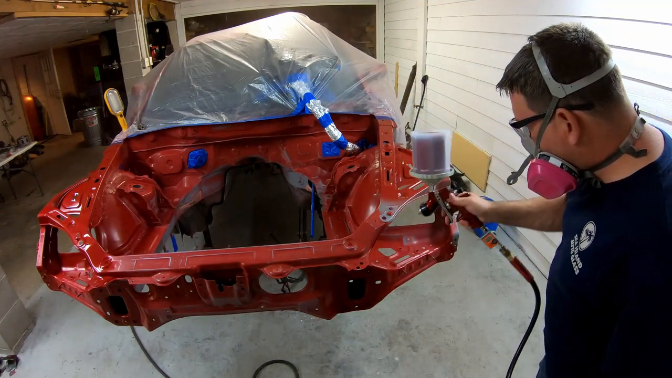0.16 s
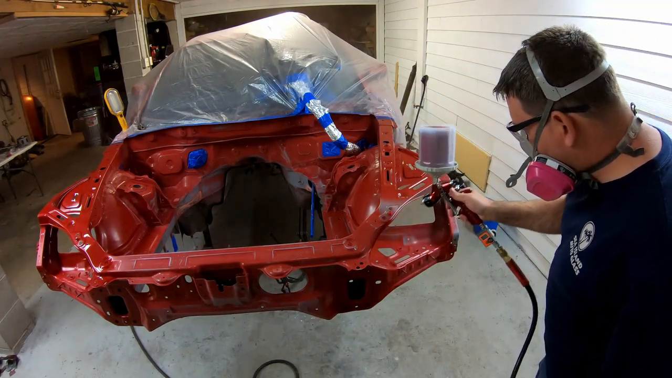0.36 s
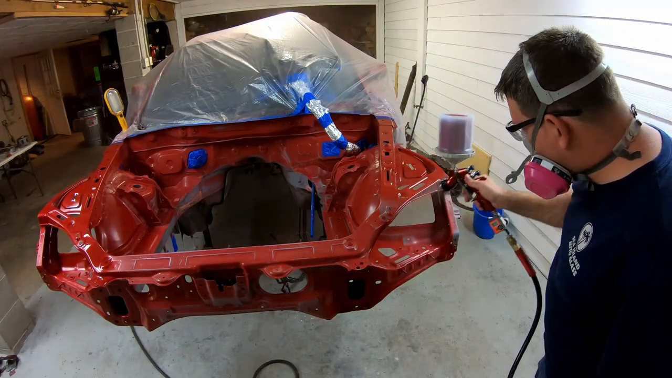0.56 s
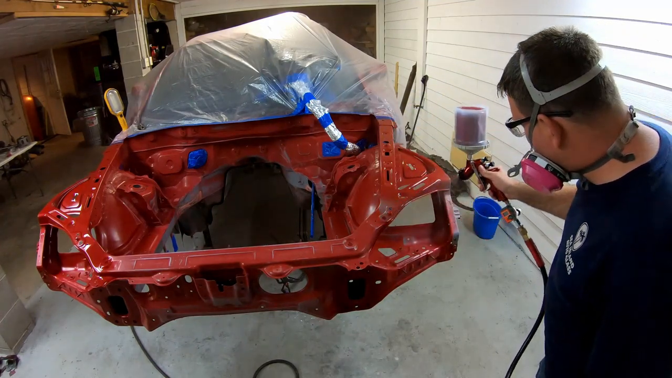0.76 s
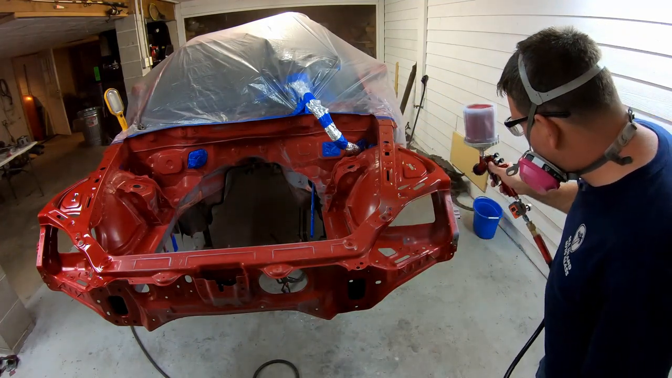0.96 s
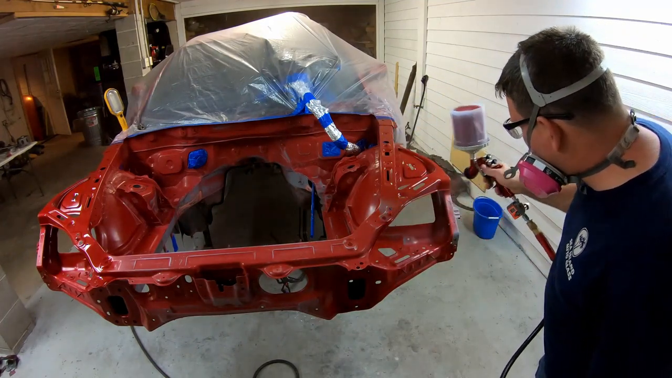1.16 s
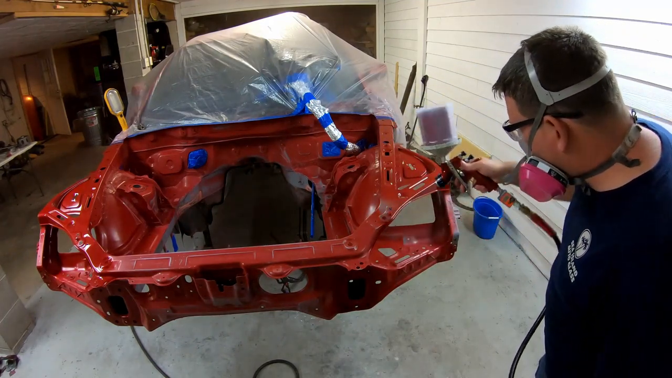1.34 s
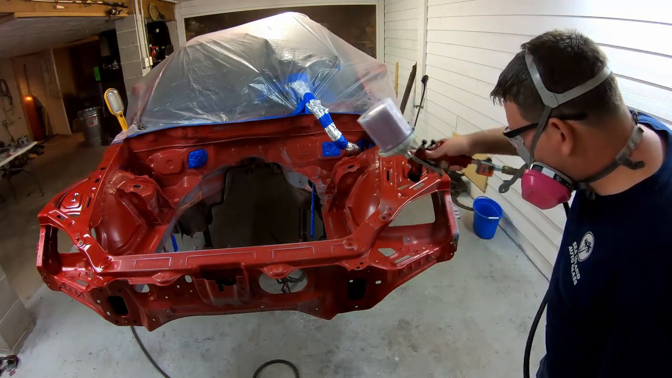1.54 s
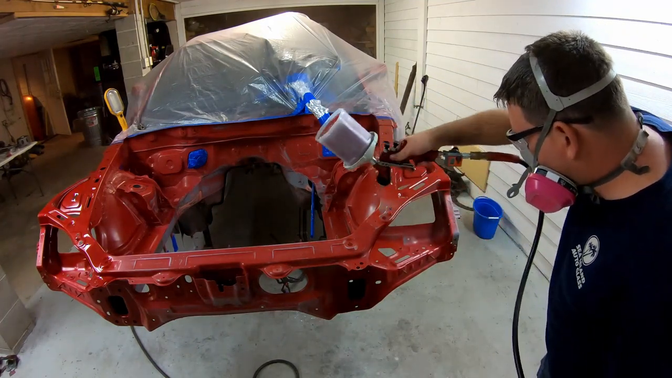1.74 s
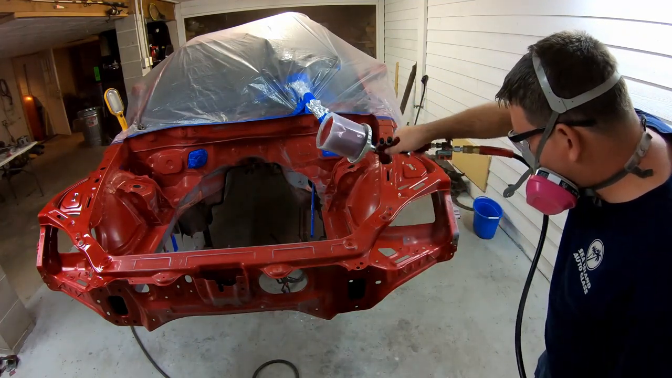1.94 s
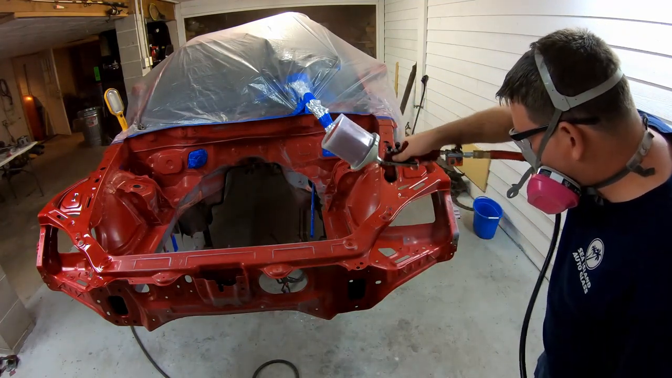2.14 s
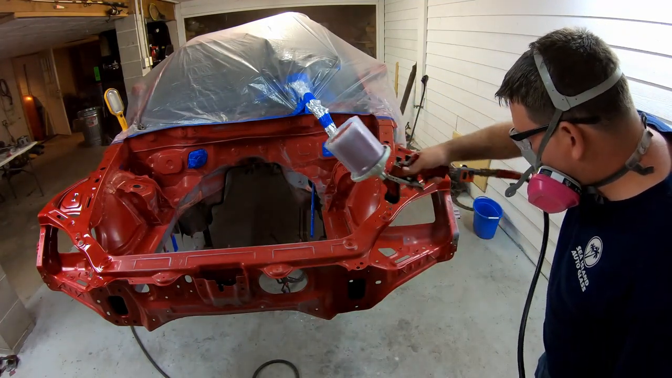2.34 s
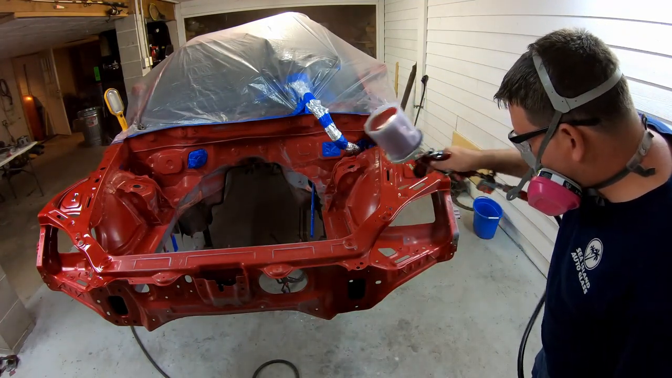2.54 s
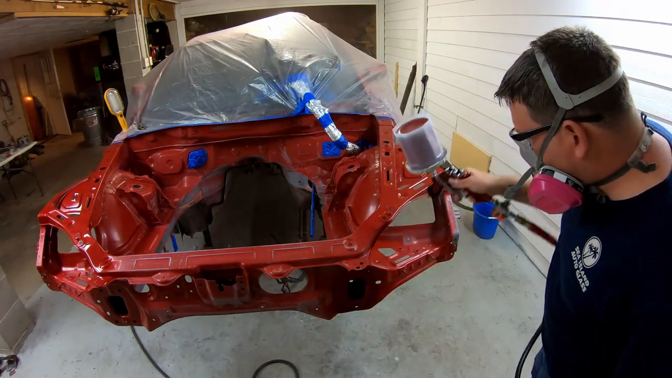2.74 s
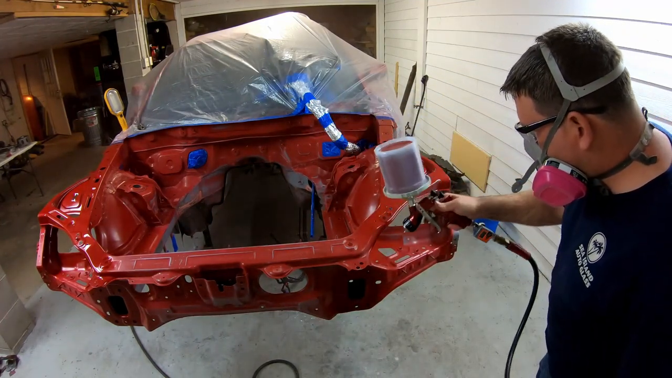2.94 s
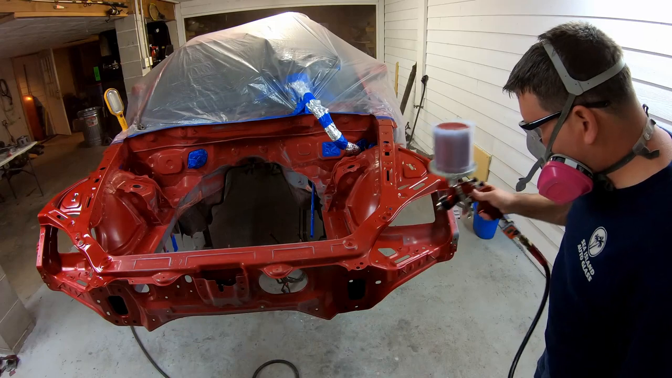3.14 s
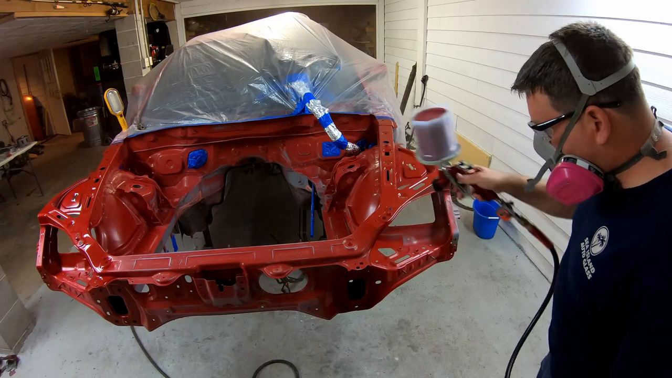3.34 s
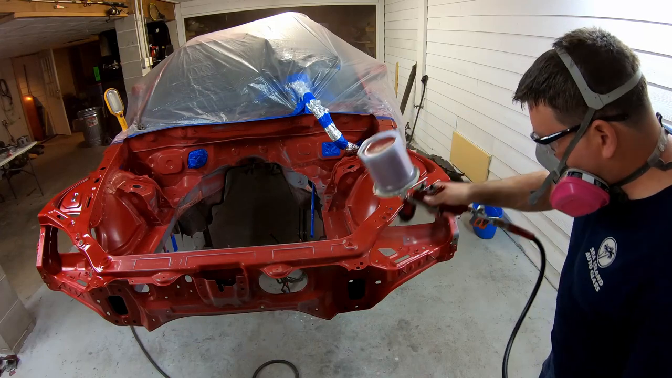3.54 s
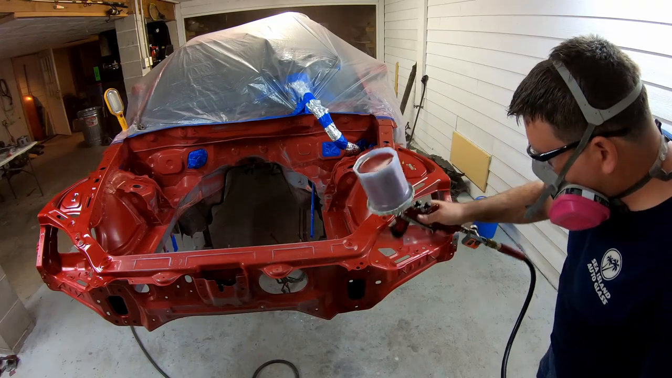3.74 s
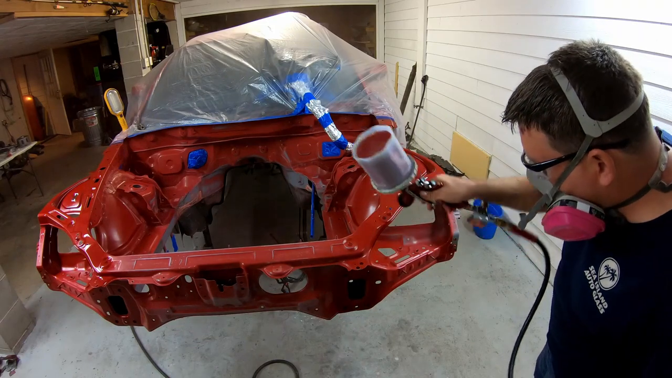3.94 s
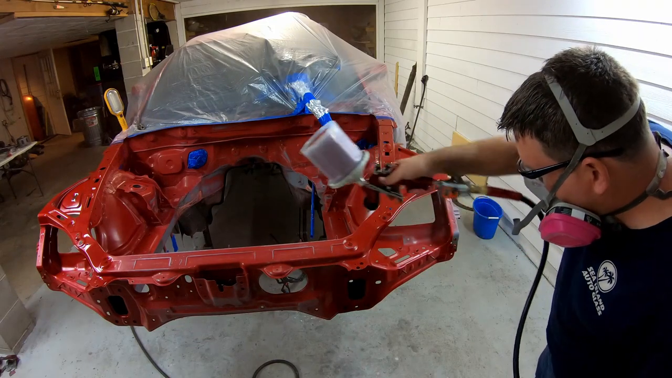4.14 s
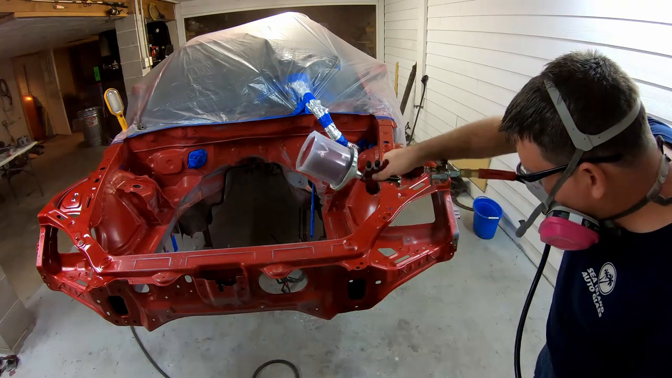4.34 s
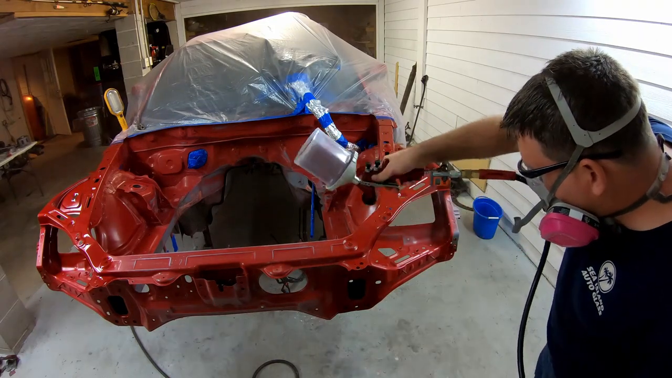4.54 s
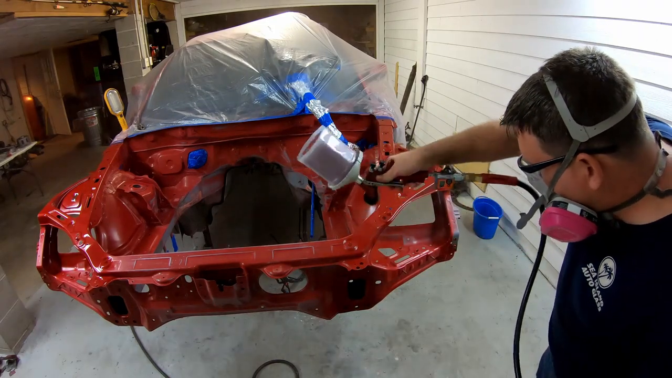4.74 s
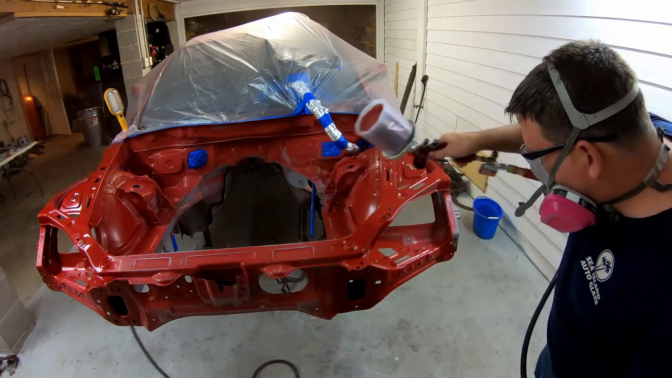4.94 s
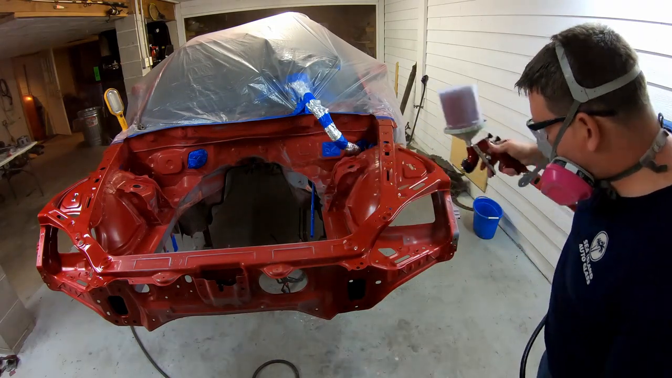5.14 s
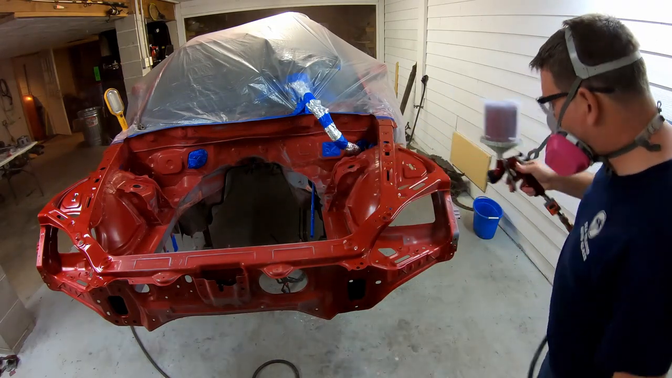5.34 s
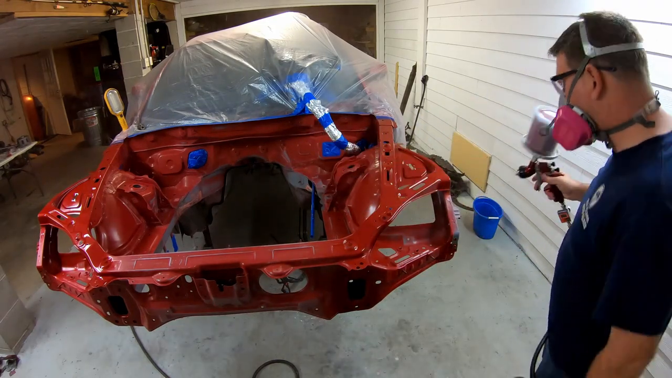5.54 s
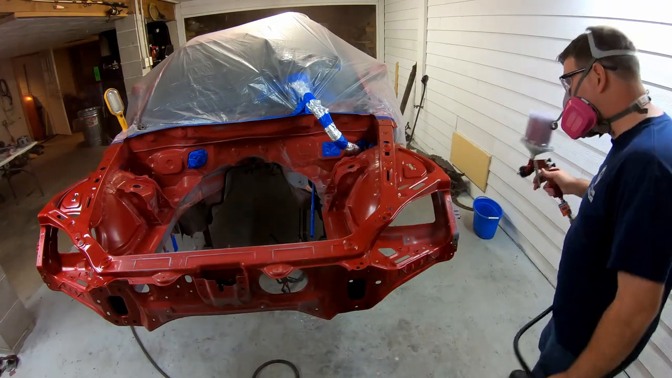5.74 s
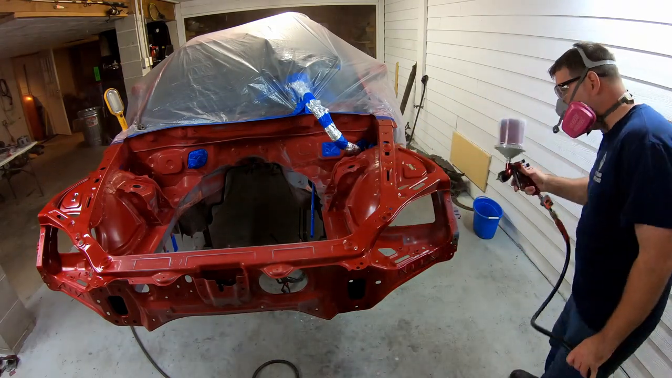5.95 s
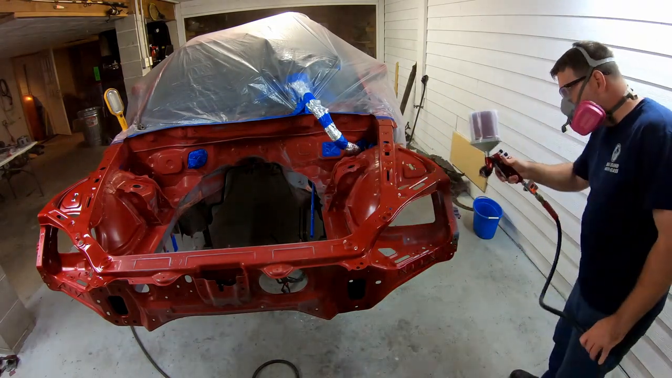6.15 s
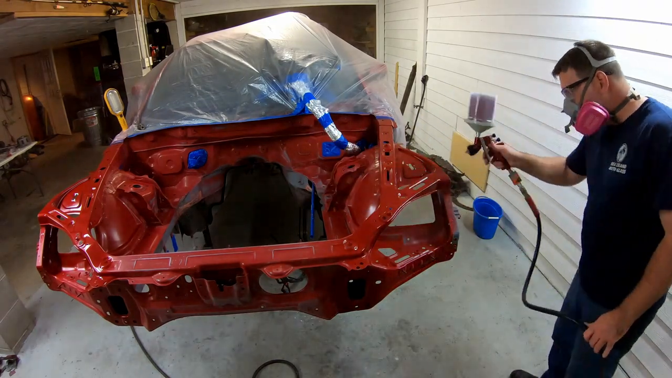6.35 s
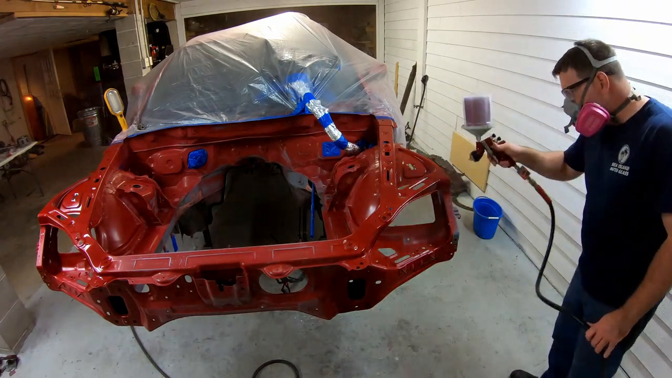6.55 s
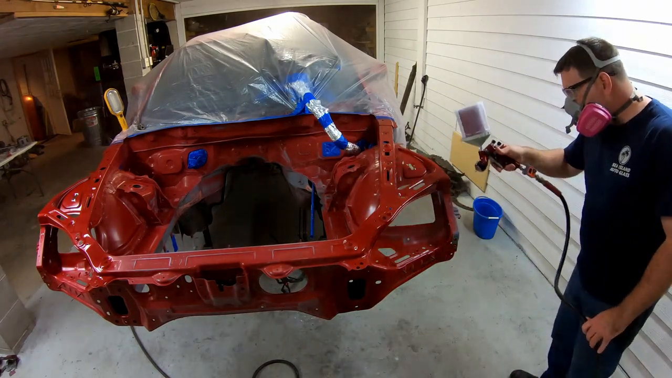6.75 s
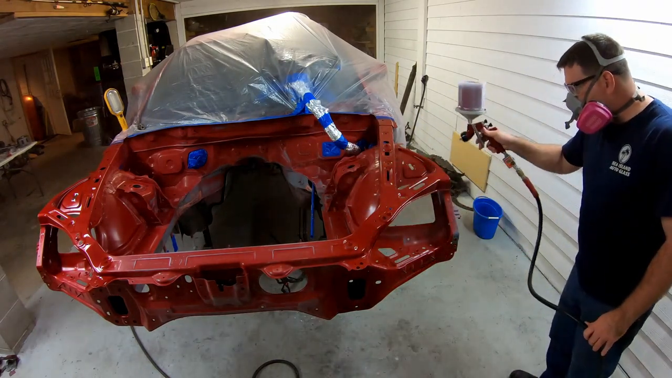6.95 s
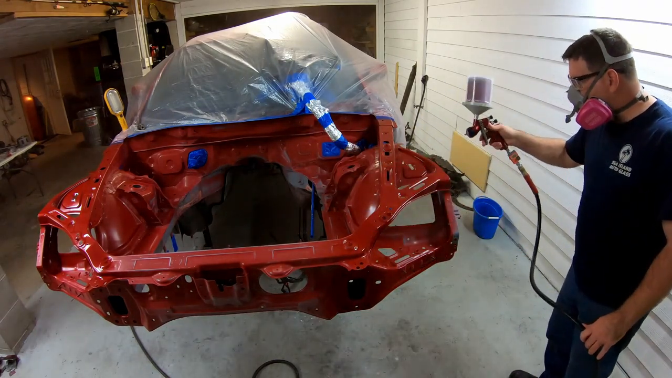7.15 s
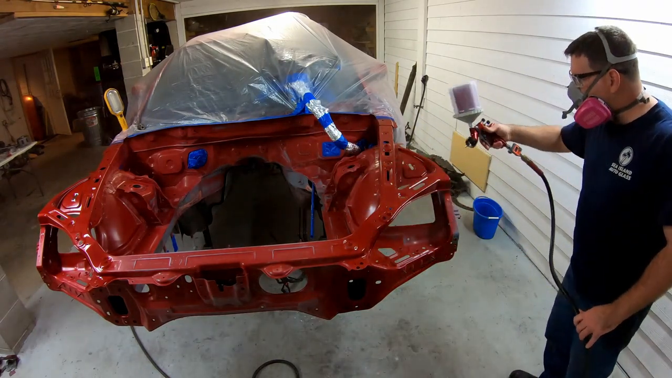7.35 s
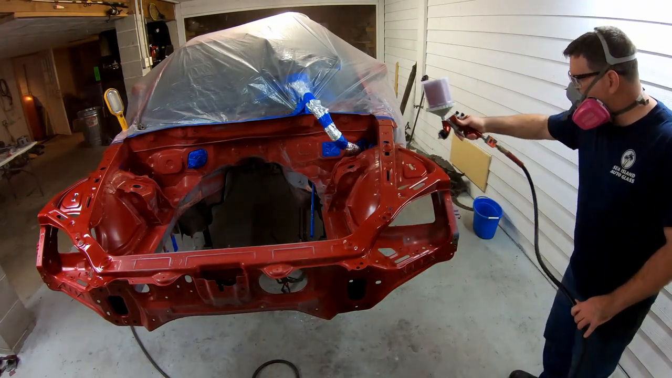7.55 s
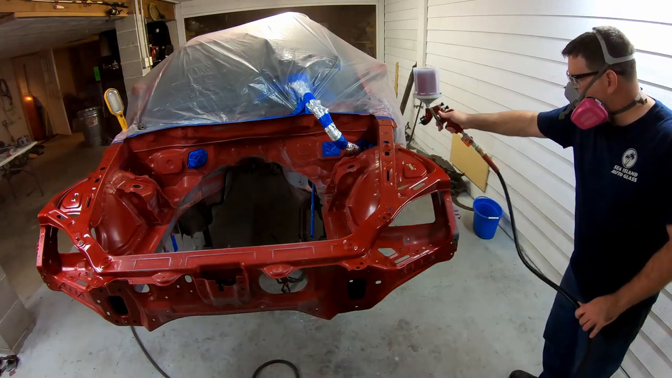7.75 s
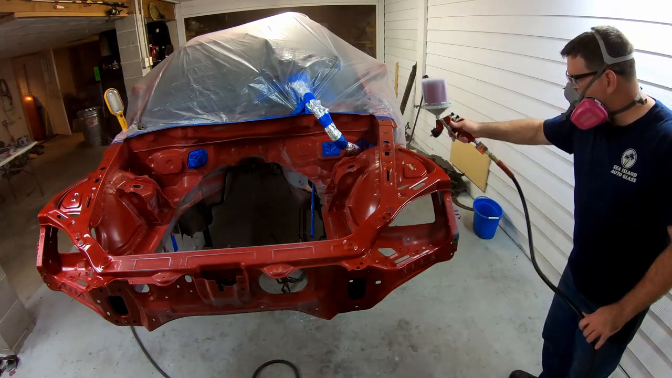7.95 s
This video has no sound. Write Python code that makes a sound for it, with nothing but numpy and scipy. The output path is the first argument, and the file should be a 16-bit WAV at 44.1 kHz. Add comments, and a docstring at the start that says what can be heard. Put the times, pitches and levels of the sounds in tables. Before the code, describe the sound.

In a garage, a compressed-air paint gun sprays a bare car body in ten bursts over eight seconds, some brief spurts, others about a second long. Each snaps open with a surge and low puff of air, then shuts abruptly into a short echo. Faint leaking hiss, hose drag and small knocks fill the gaps; a low hollow boom joins the last burst. Close stereo microphone.

```python
"""A jet of air hisses at once: a compressed-air spray gun, triggered ten times over a bare car body in a garage.
The jet, its rush on the panels and the roar and drone of the hollow body are coloured noises under one valve;
low thumps and gusts come with each opening, and shifting random echoes make each release ring away.
Between pulls filtered hiss bleeds out, the hose drags as a fuzzy band with a wavering hum, and bursts of
resonant noise knock. Late on, a low band of noise booms as the jet blows across a cavity."""
import sys
import numpy as np
from scipy import signal
from scipy.fft import rfft, irfft, next_fast_len
from scipy.io import wavfile
from scipy.ndimage import uniform_filter1d

SR = 44100
rng = np.random.default_rng(int(sys.argv[2]) if len(sys.argv) > 2 else 0)


def pcm_store(signal):
    """Save signal as 16-bit PCM."""
    levels = np.round(np.clip(np.atleast_2d(signal), -1, 1) * 32767)
    wavfile.write(sys.argv[1], SR, levels.astype(np.int16).T)


N = 356769
T = np.arange(N) / SR  # s

# Source levels are set ahead of the room mix; colour tables shape a noise before it is levelled.
# trigger pulls: (valve fully open [s], valve starts to shut [s], opening time [s], surge of the full hose [dB],
# scale of the low push of air [dB], gust at the microphone [dB])
PULLS = [(0.0, 0.121, .012, -2, -70, -68), (0.214, 1.05, 0.016, 5.5, -52, -56),
         (1.141, 1.333, 0.016, 3, -58, -65), (1.713, 2.631, 0.013, 7.5, -51, -58),
         (2.771, 2.96, 0.018, 4.5, -47, -57.5), (3.464, 3.95, 0.018, 7.5, -47, -64),
         (4.218, 4.916, 0.017, 8.5, -46, -61.5), (5.826, 5.958, .027, 3.5, -73, -78),
         (6.136, 7.029, 0.027, 6, -44, -64), (7.384, 8.09, 0.017, 4.5, -44, -59)]
# colours of the hissing jet, its thin top heard most on axis, the rush on the panel,
# the roar in the recesses and the drone of the body: (frequency [Hz], relative density [dB])
JET_COLOUR = [(2470, -43), (4200, -17), (4950, -10.5), (7030, 1), (8750, 1.5), (9290, 1), (11400, -16.5),
              (13000, -48)]
FIZZ_COLOUR = [(9500, -2.5), (11400, -3), (12600, -1.5), (15500, -11)]
RUSH_COLOUR = [(880, -15.5), (1500, -8.5), (2090, -5), (3110, 1.5), (4930, 0), (5500, -0.5), (7150, -8.5),
               (12100, -120)]
ROAR_COLOUR = [(240, -48), (400, -10.5), (467, -12.5), (506, -10.5), (641, -7), (2000, -2.5), (2600, -3),
               (4400, -120)]
DRONE_COLOUR = [(65, -63), (110, -47), (129, -9), (221, -3), (281, -1), (335, -3.5), (429, -11.5),
                (500, -7.5), (650, -14), (1100, -120)]
# one entry each for jet, fizz, rush, roar, drone: (base level [dB])
LAYER_DB = [-29, -44.5, -35, -43, -54.5]
# same five layers, roar and drone build up late: (change per dB of surge [dB])
SURGE_SHARE = [0.9, 1.0, 1, -0.95, -0.089]
# same five layers: (time constant of the surge settling [s])
SURGE_S = [0.053, 0.068, 0.013, 0.05, 0.011]
# same five layers: (change per dB of aim [dB])
AIM_SHARE = [1.01, 1.35, 0.5, -1.4, -1.12]
# the gun swings between recesses and open panel: (time [s], aim [dB], extra drone [dB])
AIM = [(0.0, 3, -7), (0.08, 3.5, 6), (0.3, -0.5, 1.5), (0.97, 0, 1), (1.03, 2, -6.5), (1.3, 1.5, 1.5),
       (1.9, -0.5, -2), (2.12, 0.5, -5), (2.26, 0.5, 3.5), (2.43, 4, 0), (2.54, 0.5, -4.5), (2.9, 2, 5),
       (3.6, 0, -1), (3.74, 3.5, -7), (3.8, -1.5, -7), (3.96, 1, 8.5), (4.35, -1, -1), (4.48, 2, 1),
       (4.6, 0, -1), (4.7, 3.5, 0), (4.86, -1.5, -8), (4.92, 4, 8), (5.86, 2.5, -5), (5.93, 2.5, -10),
       (6.34, -0.5, -1), (6.52, 2.5, 3.5), (6.6, -0.5, -2), (6.8, 3, -10), (6.9, 0, 0), (7.03, 2, 3.5),
       (7.5, 2.5, 5.5), (7.6, 1, 6.5), (7.86, 1.5, 0.5), (8.09, -1, 3)]
# extra roar, deeper where the gun works inside the bay: (time [s], level [dB])
ROAR_LEVEL = [(0.0, 2.5), (0.5, 0), (1.3, -1), (1.9, 0), (2.1, -2.5), (2.25, 4), (2.5, 1), (2.9, 1.5),
              (3.6, 2.5), (3.9, -0.5), (4.4, 0), (4.85, 2.5), (5.9, -0.5), (6.4, -1), (7.0, -0.5), (7.6, 2),
              (8.09, 0)]

# lone gusts besides those of the openings: (start [s], peak level [dB])
LONE_GUSTS = [(0.26, -78), (0.57, -68), (0.9, -69), (2.64, -65), (3.97, -69.5), (4.65, -71), (6.5, -71.5),
              (6.65, -67), (6.93, -71.5), (7.66, -59.5), (7.82, -67), (7.95, -63)]
# colour of the gusts: (frequency [Hz], relative density [dB])
GUST_COLOUR = [(20, -9.5), (35, 3.5), (55, 1), (80, 10), (110, -2), (140, -31)]
GUST_S, CALM_DB = 0.03, -90.5  # time a gust takes to peak [s], level between gusts [dB]

# how alike the direct sound and the gusts are in the two channels: (frequency [Hz], likeness [-1 to 1])
DIRECT_LIKENESS = [(60, 0.76), (300, 1), (700, 0.97), (1400, 0.53), (3100, 0.86), (6000, 0.49),
                   (15000, 0.31)]
# phase lead of the left port in the direct sound: (frequency [Hz], lead [rad])
LEFT_LEAD = [(0, -1), (690, 0.56), (1030, 1.08), (4390, -0.45), (5000, 1.5), (6720, -1.5), (8350, -2),
             (10200, -4), (13900, -9.0), (15200, -9)]
LEAN_DB = -1  # the gun stands nearer one port: left minus right [dB]
# how fast the garage echoes die: (frequency [Hz], time to fall 60 dB [s])
ECHO_T60 = [(100, 1), (300, 0.35), (1000, 0.64), (3000, 0.6), (8000, 0.43), (14000, 0.13)]
# how alike the echoes and the still air are in the two channels: (frequency [Hz], likeness [-1 to 1])
ROOM_LIKENESS = [(60, 0.35), (300, 0.82), (700, 0.15), (1400, 0.3), (3100, 0.43), (6000, 0.15),
                 (15000, 0.063)]
# colour of the echoes, thin below about 190 Hz: (frequency [Hz], gain [dB])
ECHO_COLOUR = [(150, -6), (190, -2), (260, 0), (16000, -1)]
WET_DB = -3.5  # echoes against direct sound, before both are scaled together
# colour of the still garage: (frequency [Hz], relative density [dB])
AIR_COLOUR = [(15, -46), (25, -16), (427, -16), (709, -12), (978, -16.5), (1180, -15.5), (2180, -32),
              (5420, -35), (15000, -57)]
AIR_DB = -66

# puffs of air bleeding past the half-released trigger: (peak [s], swell [dB/s], fade [dB/s],
# peak hiss level [dB], hollow band over the hiss at the peak [dB])
BLEED = [(1.69, 15, 300, -60.5, -24), (3.08, 60, 48, -51.5, -10), (3.265, 38, 252, -43.5, -6.5),
         (3.45, 46, 300, -64, -16), (4.2, 60, 300, -55.5, -24), (5.17, 300, 110, -50.5, -12),
         (5.23, 122, 130, -55, -2), (5.435, 82, 258, -49.5, -11), (5.73, 600, 40, -66, -22),
         (6.12, 60, 300, -47.5, -28), (7.13, 102, 49, -42.5, -7.5)]
# colour of the bleeding hiss: (frequency [Hz], relative density [dB])
BLEED_COLOUR = [(590, -58), (1000, -18), (1840, -11), (2340, -12), (2870, -8.5), (3790, -9), (4550, -7),
                (7630, -5), (10500, -8), (11900, -16), (15500, -25)]
HOLLOW_HZ, HOLLOW_WIDTH_HZ = 2710, 1000
HOLLOW_PEAKING = 1.2  # the hollow band swells and fades this many times faster than the hiss

# the hose dragging over the floor: (start [s], end [s], scrape level [dB], hum level before its lumps [dB])
DRAG = [(1.51, 1.707, -88, -71.5), (3.05, 3.25, -70, -73), (3.2, 3.404, -65.5, -89),
        (5.2, 5.55, -69.5, -84), (5.542, 5.8, -68, -85), (5.74, 5.902, -72, -64), (7.1, 7.39, -71, -69.5)]
SCRAPE_HZ, SCRAPE_WIDTH_HZ = 725, 210
HUM_HZ, HUM_WAVER_HZ = 207, 6.1  # mean pitch, RMS waver

# small knocks: (start [s], level before attack and decay [dB], centre [Hz], time to fall 60 dB [s],
# width [octaves])
KNOCKS = [(1.533, -71, 600, .03, 1.5), (3.255, -59, 310, .1, .4), (3.354, -57, 1230, .2, .12),
          (3.355, -58, 1610, 0.18, 0.092), (3.98, -55, 282, 0.069, .6), (4.989, -41.5, 1020, 0.094, 0.53),
          (5.744, -50, 420, 0.25, 1.5), (5.974, -50, 200, 0.084, 0.79), (6.032, -50, 377, 0.27, 1.5)]

# the jet blows across a cavity and it booms: (start [s], end [s], peak level [dB])
BOOMS = [(7.515, 7.842, -44.5), (7.87, 8.2, -49.5)]
BOOM_HZ, BOOM_WIDTH_HZ = 267, 112

# colour difference of the two ports: (frequency [Hz], left minus right [dB])
PORT_TILT = [(60, 1), (110, -1.5), (200, 0), (380, 0.5), (700, -1.5), (1290, -2), (2380, -1), (4400, -1),
             (8120, -0.5), (15000, 3.5)]
EDGE_HZ = 15740  # upper band limit


def gain_of(db):
    """Amplitude gain of a level in dB."""
    return 10 ** (np.asarray(db) / 20)


def evened(x):
    """Scales a signal to an RMS of one."""
    return x / np.sqrt(np.mean(x ** 2) + 1e-20)


def read(points, hz):
    """Reads a frequency table between its points, on a log frequency scale."""
    f, value = np.transpose(points)
    return np.interp(np.log(hz + 1), np.log(f + 1), value)


def filtered(x, response):
    """Multiplies the spectrum of x by response(hz)."""
    size = next_fast_len(x.shape[-1])
    spectrum = rfft(x, size) * response(np.fft.rfftfreq(size, 1 / SR))
    return irfft(spectrum, size)[..., :x.shape[-1]]


def shade(colour):
    """Gain of a colour table, falling away steeply outside its ends."""
    low, high = colour[0][0], colour[-1][0]

    def response(hz):
        skirts = np.minimum(hz / low, 1) ** 4 * np.minimum(high / (hz + 1), 1) ** 4
        return gain_of(read(colour, hz)) * skirts
    return response


def smooth_noise(size, passes=1):
    """Slow random movement: noise under a running mean of so many samples."""
    x = rng.standard_normal(N)
    for _ in range(passes):
        x = uniform_filter1d(x, size=size)
    return evened(x)


def turbulence(colour, patchy_db, flutter_db):
    """Coloured noise with drifting patches and a fast flutter shared by all frequencies."""
    frames = N // 128 + 5
    real, imaginary, patches = rng.standard_normal((frames, 257, 3)).T
    patches = uniform_filter1d(patches, size=8, axis=0)  # across frequency
    patches = evened(uniform_filter1d(patches, size=30, axis=1))  # across time
    grains = (real + 1j * imaginary) * gain_of(patchy_db * patches)
    noise = signal.istft(grains, nperseg=512, noverlap=384)[1][:N]
    fluttering = noise * gain_of(flutter_db * smooth_noise(60))
    return evened(filtered(fluttering, shade(colour)))


def band(hz, width):
    """Noise through a steep resonance."""
    return evened(filtered(rng.standard_normal(N), lambda f: 1 / (1 + (2 * (f - hz) / width) ** 4)))


def pair(a, b, likeness):
    """Two channels from two unrelated signals, alike by a table over frequency."""
    def alike(hz):
        return np.clip(read(likeness, hz), -1, 1)

    second = filtered(a, alike) + filtered(b, lambda hz: np.sqrt(1 - alike(hz) ** 2))
    return np.array([a, second])


def gun():
    """Jet, fizz, rush, roar and drone: five turbulent noises under one valve, balanced by the aim."""
    colours = [(JET_COLOUR, -0.03, 0.9), (FIZZ_COLOUR, 0.6, 0.9), (RUSH_COLOUR, 1.23, 0.0),
               (ROAR_COLOUR, 1.3, 0.7), (DRONE_COLOUR, 1.3, 1.6)]  # colour, patches [dB], flutter [dB]
    s, aim_db, drone_db = np.transpose(AIM)
    levels_db = np.outer(AIM_SHARE, np.interp(T, s, aim_db)) + np.array(LAYER_DB)[:, None]
    levels_db[-1] += np.interp(T, s, drone_db)
    levels_db[-2] += np.interp(T, *np.transpose(ROAR_LEVEL))
    valve = np.zeros((len(colours), N))
    for start, end, opening, surge_db, *_ in PULLS:
        rise_db = 40 * np.minimum(T - start, 0) / opening  # climbs 40 dB in the opening time
        fall_db = -np.maximum(T - end, 0) * 224.0  # dB per second
        open_db = np.maximum(rise_db + fall_db, -200)
        since = np.maximum(T - start, 0)
        snap_db = 3.03 * np.exp(-since / 0.05)
        settling = np.exp(-since / np.array(SURGE_S)[:, None]) * np.array(SURGE_SHARE)[:, None]
        valve += gain_of(open_db + snap_db + surge_db * settling)
    layers = np.array([turbulence(*colour) for colour in colours])
    return (valve * gain_of(levels_db) * layers).sum(0)


def thumps():
    """A low suck and push of air, rising in pitch and dying away, around each opening."""
    out = np.zeros(N)
    for start, *_, thump_db, _ in PULLS:
        u = np.maximum(T - start + .004, 0) / .02  # begins 4 ms ahead, in units of 20 ms
        out -= gain_of(thump_db) * np.sin(3.6 * u + .3 * u ** 2) * u * np.exp(-u)
    return out


def buffet():
    """Lumpy low noise, much alike at both ports: a gust follows each opening, a few come alone."""
    low = filtered(pair(*rng.standard_normal((2, N)), DIRECT_LIKENESS), shade(GUST_COLOUR))
    opening_gusts = [(pull[0], pull[-1]) for pull in PULLS]
    level = gain_of(CALM_DB)
    for start, db in LONE_GUSTS + opening_gusts:
        u = np.maximum(T - start, 0) / GUST_S
        level = level + gain_of(db) * u * np.exp(1 - u)
    return level * evened(low)


def ports(a, b):
    """The spray is a wide source: the two ports hear it partly alike, with a lean and a phase lead."""
    right, left = pair(a, b, DIRECT_LIKENESS)
    left = filtered(left, lambda hz: np.exp(1j * read(LEFT_LEAD, hz)))
    return np.array([left, right]) * gain_of([[LEAN_DB / 2], [-LEAN_DB / 2]])


def echoes():
    """Dense random echoes, each band dying at its own speed with its energy kept."""
    noise = pair(*rng.standard_normal((2, SR)), ROOM_LIKENESS)
    hz, t, grains = signal.stft(noise, SR, nperseg=256)
    t60 = read(ECHO_T60, hz)[:, None]
    dying = grains * gain_of(-60 * t / t60) / np.sqrt(t60)
    tail = signal.istft(dying, SR, nperseg=256)[1]
    return np.pad(tail, [(0, 0), (200, 0)]) / np.linalg.norm(tail[0])  # 200 samples of pre-delay


def garage(x, count=8):
    """The gun never rests, so its echoes keep changing: the sound is handed from one pattern to the next."""
    place = T / .016 % count  # a new pattern every 16 ms, going round
    out = np.zeros((2, N))
    for k in range(count):
        away = abs((place - k + count / 2) % count - count / 2)
        share = np.cos(np.pi / 2 * np.minimum(away, 1))  # equal-power crossfade
        out += signal.fftconvolve((x * share)[None], echoes(), axes=1)[:, :N]
    return filtered(out, shade(ECHO_COLOUR))


def still_air():
    """The quiet garage: steady coloured noise, partly alike in the two channels."""
    noise = pair(*rng.standard_normal((2, N)), ROOM_LIKENESS)
    return gain_of(AIR_DB) * evened(filtered(noise, shade(AIR_COLOUR)))


def bleed():
    """Air leaking past the trigger: puffs of thin hiss with a hollow resonant band in them."""
    hiss, hollow = np.zeros((2, N))
    for peak, swell, fade, db, hollow_db in BLEED:
        slope_db = -swell * np.maximum(peak - T, 0) - fade * np.maximum(T - peak, 0)
        under_db = np.maximum(slope_db, -200)
        hiss += gain_of(db + under_db)
        hollow += gain_of(db + hollow_db + HOLLOW_PEAKING * under_db)
    thin = turbulence(BLEED_COLOUR, patchy_db=-3.0, flutter_db=-1.5)
    return hiss * thin + hollow * band(HOLLOW_HZ, HOLLOW_WIDTH_HZ)


def hose():
    """Rubber on concrete: a fuzzy band and a wavering hum, heard only while the hose moves."""
    start, end, scrape_db, hum_db = np.transpose(DRAG)
    moving = np.sin(np.pi * np.clip((T[:, None] - start) / (end - start), 0, 1)) ** 0.35
    pitch_hz = HUM_HZ + HUM_WAVER_HZ * smooth_noise(2000, passes=2)
    hum = np.sqrt(2) * np.sin(2 * np.pi * np.cumsum(pitch_hz) / SR)
    hum *= gain_of(4.0 * smooth_noise(700, passes=2))  # it comes in lumps
    scrape = band(SCRAPE_HZ, SCRAPE_WIDTH_HZ)
    return moving @ gain_of(scrape_db) * scrape + moving @ gain_of(hum_db) * hum


def knocks():
    """Each knock is a dying burst of noise in a resonance around its centre."""
    out = np.zeros(N)
    t = np.arange(SR // 3) / SR
    for start, db, hz, t60, octaves in KNOCKS:
        noise = rng.standard_normal(len(t))
        ring = evened(filtered(noise, lambda f: 1 / (1 + (2 * np.log2((f + 1) / hz) / octaves) ** 4)))
        attack = 1 - np.exp(-t / 0.0035)
        at = round(start * SR)
        out[at:at + len(t)] += gain_of(db - 60 * t / t60) * attack * ring
    return out


def cavity():
    """Noise in one low resonance, swelling while the jet crosses the opening."""
    swell = np.zeros(N)
    for start, end, db in BOOMS:
        swell += gain_of(db) * np.sin(np.pi * np.clip((T - start) / (end - start), 0, 1))
    return swell * band(BOOM_HZ, BOOM_WIDTH_HZ)


def scene():
    """Mixes direct sound and echoes, then adds thumps, gusts and still air; hose and cavity stay dry."""
    small = knocks()
    close = hose() + cavity()
    a, b = (gun() + bleed() + small for _ in range(2))  # two unrelated sprays, the same knocks
    wet = gain_of(WET_DB)
    heard = ports(a + close, b + close) + wet * garage(a)
    heard /= np.sqrt(.5 + .5 * wet ** 2)
    return heard + thumps() + buffet() + still_air()


def record(dry):
    """The two ports differ in colour; a steep low-pass then limits the band."""
    tilted = filtered(dry, lambda hz: gain_of(np.outer([.5, -.5], read(PORT_TILT, hz))))
    low_pass = signal.firwin(1023, EDGE_HZ, window=("kaiser", 11), fs=SR)
    return signal.oaconvolve(tilted, low_pass[None], "same")


dry = scene()
out = record(dry)
pcm_store(out)
```